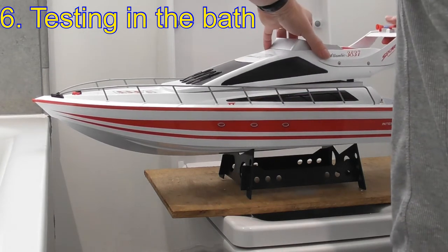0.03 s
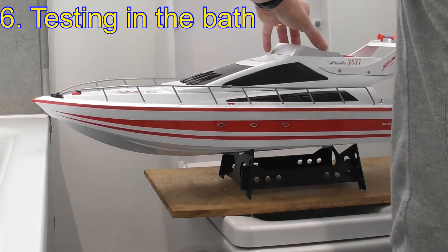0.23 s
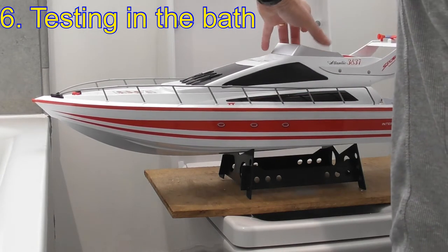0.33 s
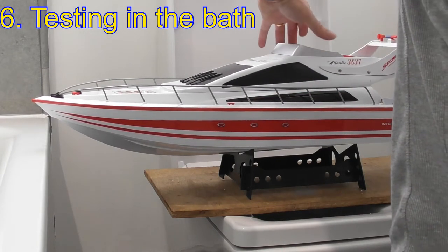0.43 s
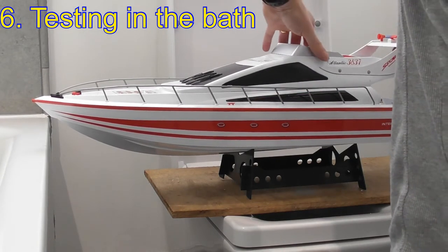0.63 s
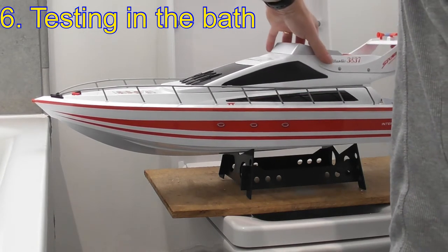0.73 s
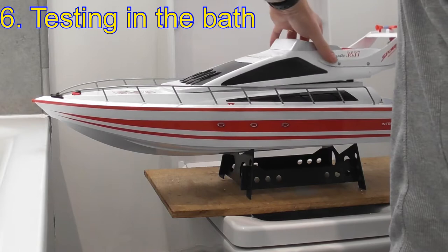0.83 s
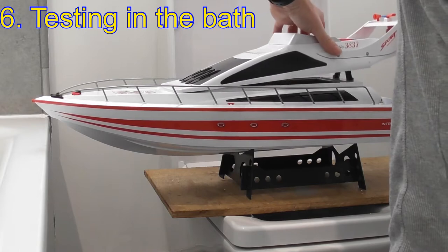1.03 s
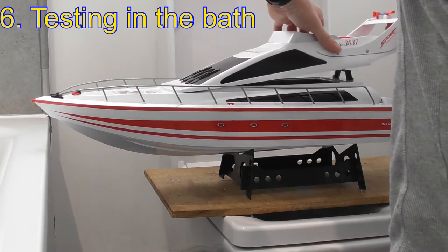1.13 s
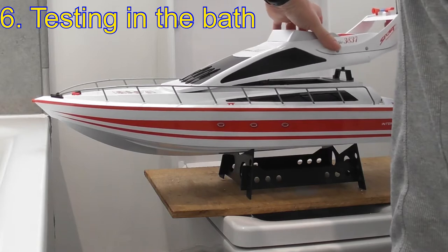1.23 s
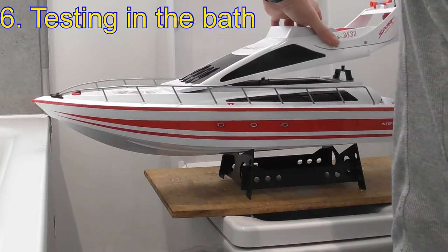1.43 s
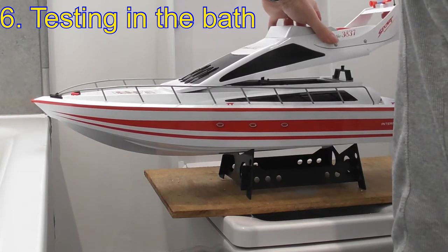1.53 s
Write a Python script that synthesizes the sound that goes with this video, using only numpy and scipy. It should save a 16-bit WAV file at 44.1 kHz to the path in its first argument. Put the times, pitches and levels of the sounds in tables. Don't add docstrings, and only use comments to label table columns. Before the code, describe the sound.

A plastic boat cabin slides briefly and drops on its hull with a rapid hard clatter, then gets nudged and lifted with quieter taps; hard walls ring on over low hum, heard by close twin microphones.

```python
import sys
import numpy as np
from scipy import signal
from scipy.fft import rfft, irfft, next_fast_len
from scipy.io import wavfile

SR = 44100
rng = np.random.default_rng(int(sys.argv[2]) if len(sys.argv) > 2 else 0)


def volts_from_decibels(level):
    exponent = np.asarray(level, float) / 20
    return 10 ** exponent


def to_wav(s):
    ch = np.atleast_2d(s).T
    pcm = np.round(np.clip(ch, -1, 1) * 32767)
    wavfile.write(sys.argv[1], SR, pcm.astype(np.int16))


N = 70560
LEAD = SR // 4

# start_s, clack_db, thud_db, tick_db, pitch_hz (of the hull)
IMPACTS = [(.002, -49, -32.5, -70, 626), (.021, -62, -34, -73, 545), (0.1314, -44, -49.5, -61, 270),
           (.158, -44, -34.5, -40, 370), (0.1776, -43, -33, -28.5, 270), (0.2139, -15, -15, -51, 367),
           (.223, -46, -10.5, -35, 598), (0.237, -22.5, -19, -60, 178), (0.2534, -13.5, -12, -28, 231),
           (.266, -21, -16, -36, 307), (.33, -24, -14, -70, 380), (0.5777, -25.5, -30, -60, 645),
           (.596, -27.5, -23.5, -41, 231), (0.73, -37.5, -32, -48, 400), (.7786, -24.5, -24, -61, 269),
           (0.9754, -39.5, -47, -46, 396), (0.9863, -44.5, -43, -40.5, 269), (1.2547, -32.5, -33, -52, 231),
           (1.274, -38.5, -29, -86, 297), (1.424, -42.5, -35, -80, 310), (1.523, -40.5, -40, -55, 517),
           (1.5773, -27.5, -29.5, -41, 545)]
# start_s, turn_s, end_s
SLIDE_TIMES = (.11, .178, .213)
# frequency_hz, level_db (per Hz)
THUD_SPECTRUM = [(50, -75), (110, -28.5), (220, -2), (430, -2.5), (650, -0.5), (1000, -4.5), (1400, -18),
                 (2500, -43)]
# frequency_hz, level_db (per Hz)
CLACK_SPECTRUM = [(900, 1.5), (1700, 4.5), (3000, -1.5), (4100, 2), (5100, -8), (7500, 0.5), (10000, -10),
                  (16000, -48)]
# frequency_hz, level_db (per Hz)
TICK_SPECTRUM = [(4500, -16), (7000, 0), (8500, 2), (10500, -5.5), (13000, -11.5), (16000, -27)]
# frequency_hz, level_db (per Hz)
DIRECT_TICK_SPECTRUM = [(3500, -28), (7500, 7), (12000, -3), (16000, -9)]
# frequency_hz, t60_s
ROOM_DECAY = [(80, 1.84), (200, 1.35), (600, 1.52), (1500, 1.236), (4000, 1.185), (8000, 0.74)]
# frequency_hz, t60_s
TREBLE_DECAY = [(11000, .55), (16000, .3)]
# frequency_hz, level_db (per Hz)
HUM_SPECTRUM = [(25, -42), (45, -26), (80, 3.5), (125, -29), (400, 23), (1000, -12.5), (2500, -9),
                (6000, -47)]
# frequency_hz, left_minus_right_db
PORT_LEVEL = [(70, -30), (125, -20), (250, -4), (500, -2), (1300, 1.5)]
# frequency_hz, left_lead_rad
PORT_PHASE = [(40, 1.6), (200, 0.57), (520, 0.98), (1300, 0.94)]
# frequency_hz, difference_db_or_rad
PORTS_AGREE = [(3000, 0)]
# frequency_hz, side_db
DIFFUSE_FIELD = [(30, 18), (100, 6.5), (300, -12.5), (1000, -18), (2600, -9.5), (4300, -22.5), (7800, -43),
                 (8500, -7), (14000, 2)]
MODE_HZ = (136, 171, 231, 272, 296, 350, 375, 402, 545, 586, 632, 673, 818, 945)
MODE_DB = [-3.5, 2.5, 0.5, -3.5, 0, 2, 0.5, 3, -4, -13.5, -1.5, -4, 0, -3]
MODE_T60_S = (.5, .4, 1.1, 1.5, 1.6, .8, .6, .85, .9, .8, .7, .9, 1., .8)


def on_log(table, hz):
    points = np.array(table, float)
    log_hz = np.log(np.maximum(points[:, 0], 1))
    return np.interp(np.log(np.maximum(hz, 1)), log_hz, points[:, 1])


def shape(x, gain_at):
    size = next_fast_len(x.shape[-1] + 4096)
    spectrum = rfft(x, size) * gain_at(np.fft.rfftfreq(size, 1 / SR))
    return irfft(spectrum, size)[..., :x.shape[-1]]


def colour(x, table):
    cepstrum = irfft(np.log(volts_from_decibels(on_log(table, np.fft.rfftfreq(4096, 1 / SR)))))
    cepstrum[1:2048] *= 2
    response = irfft(np.exp(rfft(cepstrum[:2049], 4096)))[:2048]
    response = response / np.sqrt(np.sum(response ** 2))
    return signal.fftconvolve(x, response)[:len(x)]


def hum():
    hum_db, hiss_db, hiss_hz = -50.5, -65, 5000
    house = shape(rng.standard_normal((2, N)), lambda f: volts_from_decibels(on_log(HUM_SPECTRUM, f)))
    hiss = shape(rng.standard_normal((2, N)), lambda f: f / (f + hiss_hz))
    return house * volts_from_decibels(hum_db) / house[0].std() + hiss * volts_from_decibels(hiss_db)


def impacts(start_s, level_db, length_s):
    t = np.arange(2048) / SR
    blows = np.zeros((len(start_s), N + LEAD))
    rattle = np.zeros(N + LEAD + 2048)
    starts = (np.array(start_s) * SR).astype(int) + LEAD
    for k, at in enumerate(starts):
        blows[k, at] = volts_from_decibels(level_db[k]) * 10
        push = rng.standard_normal(2048) * np.exp(-3 * t / length_s)
        rattle[at:at + 2048] += push * blows[k, at] / np.sqrt(np.sum(push ** 2))
    return blows, rattle[:N + LEAD]


def standing_waves(blows, pitch_hz):
    reach_oct, spill, swell_s = .12, .2, .0062
    level_db, low_cut_hz = 3, 94
    ringing = 0
    for hz, db, t60 in zip(MODE_HZ, MODE_DB, MODE_T60_S):
        turn = 2j * np.pi * hz / SR
        fade_pole = np.exp(turn - np.log(1000) / (t60 * SR))
        swell_pole = np.exp(turn - 1 / (swell_s * SR))
        coupling = spill + 1 / (1 + (np.log2(hz / pitch_hz) / reach_oct) ** 2)
        drive = (rng.choice([-1, 1], len(blows)) * coupling) @ blows
        fading = signal.lfilter([1], [1, -fade_pole], drive)
        swelling = signal.lfilter([1], [1, -swell_pole], drive)
        ringing = ringing + volts_from_decibels(db) * (fading - swelling).imag
    high_pass = signal.butter(4, low_cut_hz, "high", fs=SR, output="sos")
    return signal.sosfilt(high_pass, ringing) * volts_from_decibels(level_db) / 20


def echo():
    build_up_s, early_db, early_s = .003, 2, .014
    t = np.arange(N) / SR
    hz, frame_s, bands = signal.stft(rng.standard_normal(N), SR, nperseg=256)
    t60 = on_log(ROOM_DECAY + TREBLE_DECAY, hz)[:, None]
    tail = signal.istft(bands * volts_from_decibels(-60 * frame_s / t60), SR, nperseg=256)[1][:N]
    onset = (1 - np.exp(-t / build_up_s)) * (1 + volts_from_decibels(early_db) * np.exp(-t / early_s))
    return tail * onset / 20


def room(sources):
    return sum(signal.fftconvolve(x, echo())[LEAD:LEAD + N] for x in sources)


def scrape():
    level_db = (-56, -46.5, -47)
    t = (np.arange(N + LEAD) - LEAD) / SR
    sliding = (t > SLIDE_TIMES[0]) & (t < SLIDE_TIMES[-1])
    grains = rng.standard_normal(len(t)) * volts_from_decibels(1.2 * rng.exponential(size=len(t)))
    return sliding * grains * volts_from_decibels(np.interp(t, SLIDE_TIMES, level_db)) / 2


def ports(mid, side):
    def log_ratio(f):
        level = np.log(volts_from_decibels(on_log(PORT_LEVEL + PORTS_AGREE, f)))
        return level + 1j * on_log(PORT_PHASE + PORTS_AGREE, f)

    left = shape(mid, lambda f: np.exp(log_ratio(f) / 2))
    right = shape(mid, lambda f: np.exp(-log_ratio(f) / 2))
    return np.array([left + side, right - side])


def scene():
    earlier = (-0.11, -34.5, -25.5, -80, 270)
    start_s, clack_db, thud_db, tick_db, pitch_hz = np.array([earlier] + IMPACTS).T
    floor = hum()
    thuds, thud_rattle = impacts(start_s, thud_db - 2.5, length_s=.0085)
    clacks, clack_rattle = impacts(start_s, clack_db - 9.5, length_s=.0022)
    ticks, tick_rattle = impacts(start_s, tick_db - 4, length_s=.0012)
    slide = scrape()
    bright_slide = slide * volts_from_decibels(-4)

    sent = [colour(thuds.sum(0), THUD_SPECTRUM),
            colour(clacks.sum(0) + slide, CLACK_SPECTRUM),
            colour(ticks.sum(0) + bright_slide, TICK_SPECTRUM)]
    direct = colour(thud_rattle, THUD_SPECTRUM) + colour(slide, CLACK_SPECTRUM)
    direct = volts_from_decibels(-30) * (direct + colour(bright_slide, TICK_SPECTRUM))
    direct = direct + volts_from_decibels(-8) * colour(clack_rattle, CLACK_SPECTRUM)
    direct = direct + volts_from_decibels(-1) * colour(tick_rattle, DIRECT_TICK_SPECTRUM)

    ringing = standing_waves(thuds, pitch_hz)
    mid = room(sent) + (direct + ringing)[LEAD:] + floor[0]
    side = room(sent) + direct[LEAD:] + floor[1]
    side = shape(side, lambda f: volts_from_decibels(on_log(DIFFUSE_FIELD, f)))
    return ports(mid, side)


def top_cut(x):
    return signal.sosfilt(signal.butter(12, 16190, fs=SR, output="sos"), x)


def record(dry):
    ceiling = volts_from_decibels(4)
    soft = np.tanh(dry / ceiling) * ceiling
    low_pass = signal.butter(6, 15600, fs=SR, output="sos")
    high_pass = signal.butter(1, 55, "high", fs=SR, output="sos")
    mix = signal.sosfilt(high_pass, signal.sosfilt(low_pass, soft))
    return top_cut(mix)


dry = scene()
out = record(dry)
to_wav(out)
```